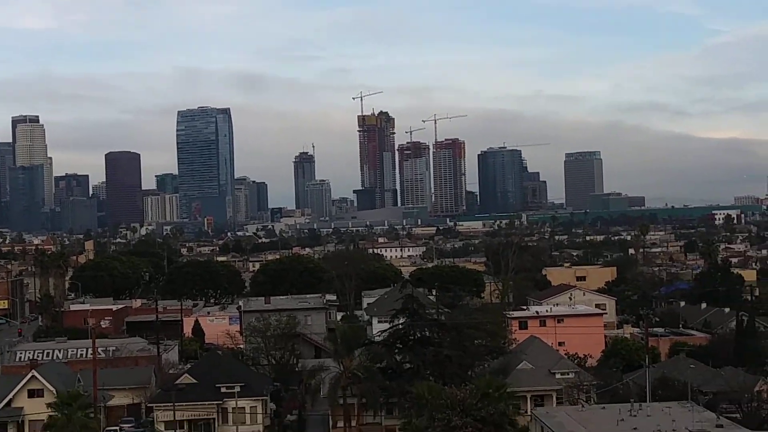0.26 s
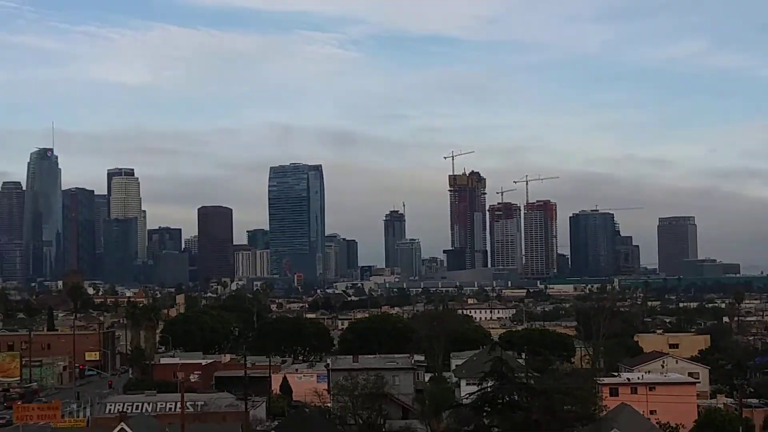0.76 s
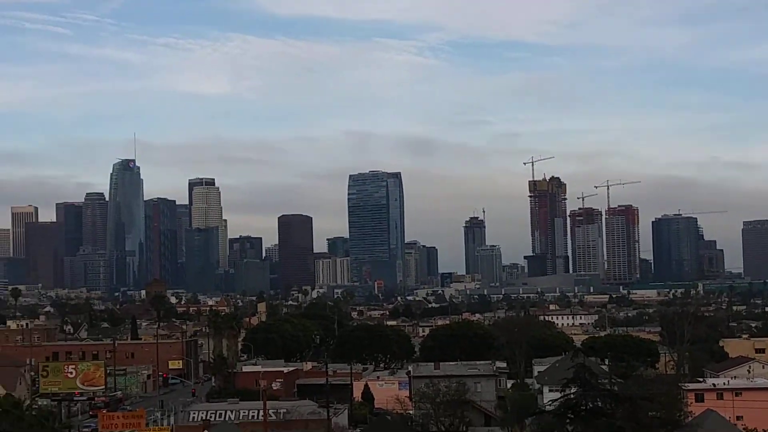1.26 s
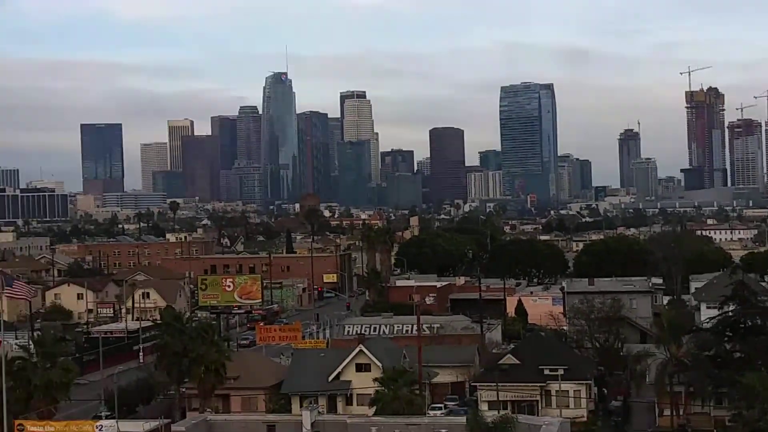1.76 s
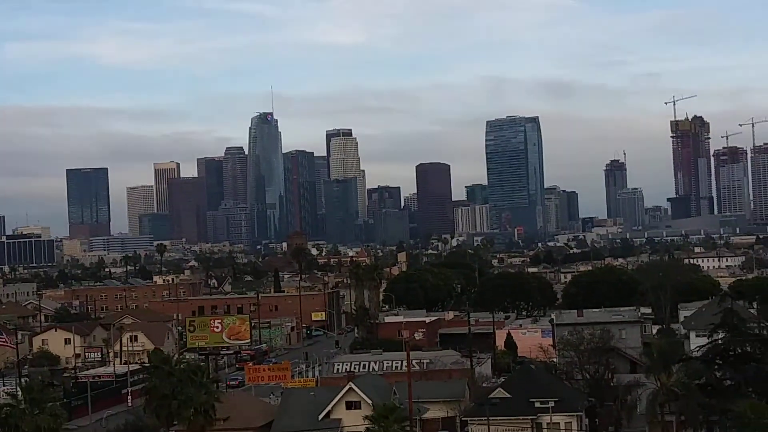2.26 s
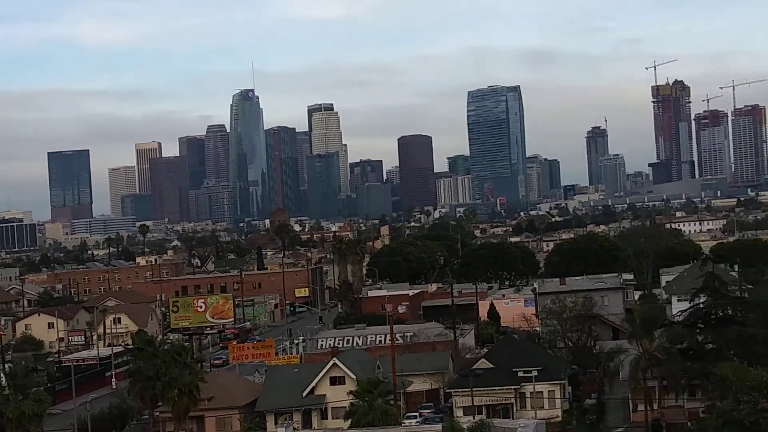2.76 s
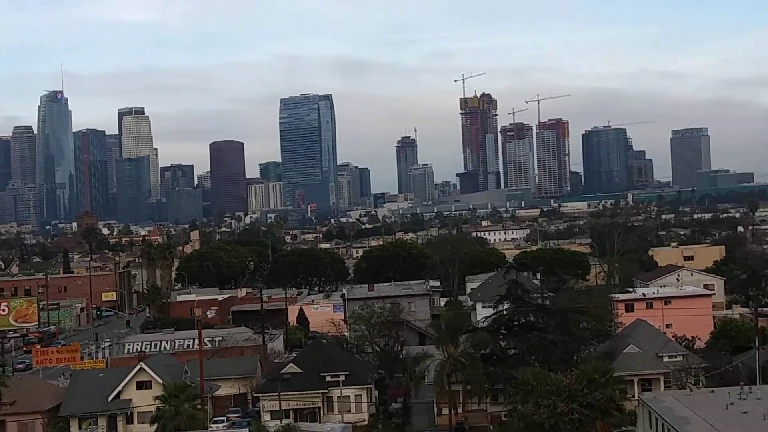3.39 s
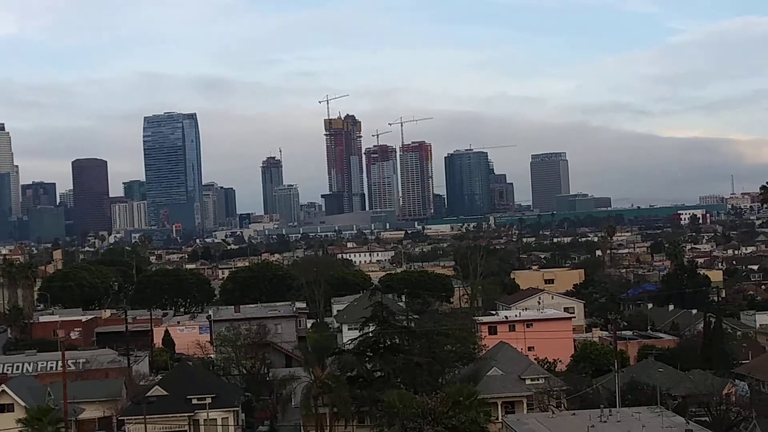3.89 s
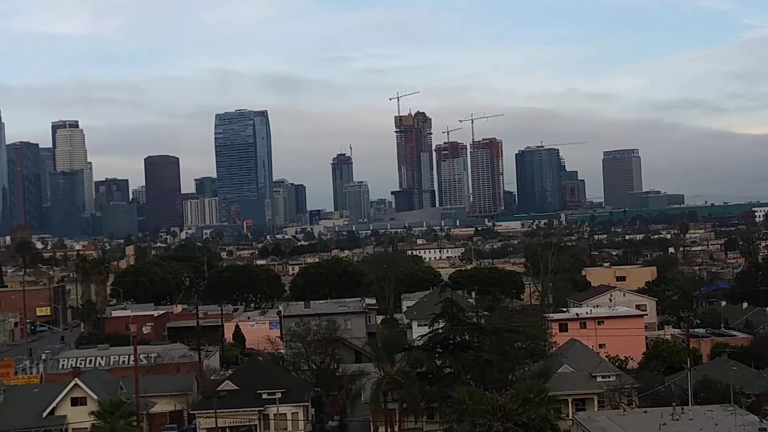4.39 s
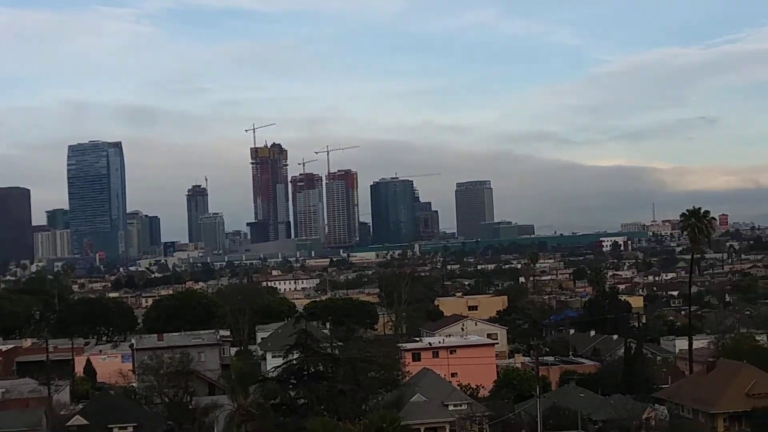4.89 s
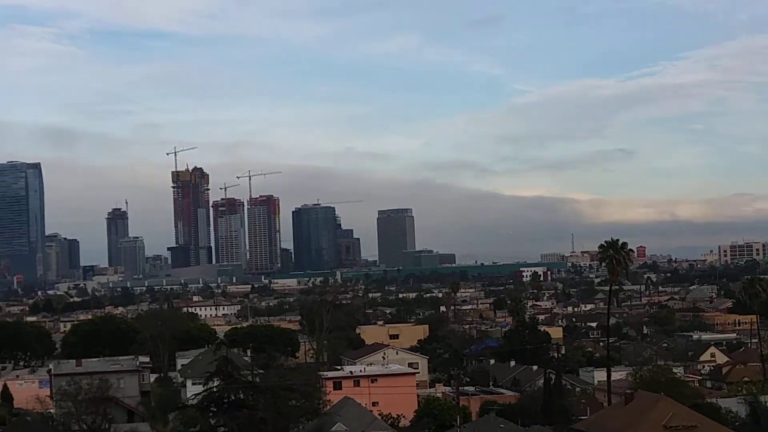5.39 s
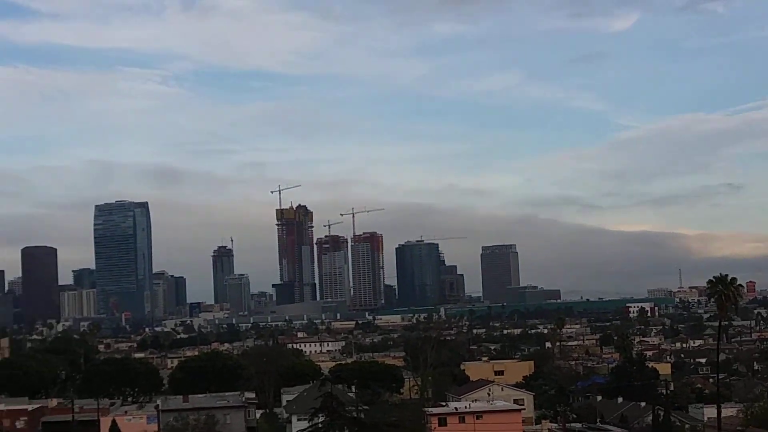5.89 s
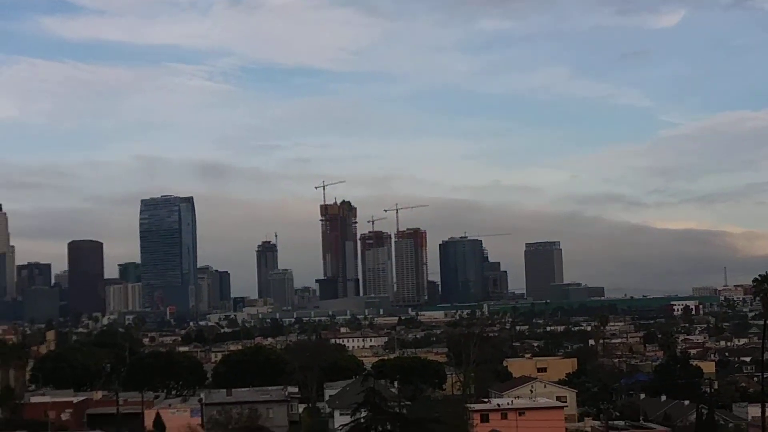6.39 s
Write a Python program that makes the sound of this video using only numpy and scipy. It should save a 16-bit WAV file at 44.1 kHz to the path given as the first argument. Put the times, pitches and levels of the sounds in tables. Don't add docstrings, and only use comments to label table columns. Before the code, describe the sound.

Close to a phone microphone at a high spot above a city, a dull latch thud is followed by a bright burst of bouncing metal. Small ticks and snaps follow while a low engine hum rises and becomes steady over muffled traffic and a thin whine. Wind thumps the microphone near four seconds; the hum sinks away, then returns weaker at the end.

```python
import sys
import numpy as np
from scipy import signal
from scipy.fft import rfft, irfft
from scipy.io import wavfile
from scipy.ndimage import uniform_filter1d

SR = 44100
rng = np.random.default_rng(int(sys.argv[2]) if len(sys.argv) > 2 else 0)


def volts_from_db(level):
    exponent = np.asarray(level, float) / 20
    return 10 ** exponent


def digitize_waveform(pressure):
    field = np.atleast_2d(pressure).T
    bounded = np.clip(field, -1, 1)
    quanta = np.round(bounded * 32767).astype(np.int16)
    wavfile.write(sys.argv[1], SR, quanta)


N = 293264
TIME = np.arange(N) / SR
HZ = np.maximum(np.fft.rfftfreq(N, 1 / SR), 1)


def rms_one(x):
    return x / np.sqrt(np.mean(x ** 2) + 1e-20)


def in_time(rows):
    s, *columns = np.transpose(rows)
    return [np.interp(TIME, s, column) for column in columns]


def shape(points, hz=HZ):
    f, level_db = np.transpose(points)
    return volts_from_db(np.interp(np.log(hz), np.log(f), level_db, left=-120, right=-120))


def noise(gain):
    return rms_one(irfft(rfft(rng.standard_normal(N)) * gain, N))


def drift(rate_hz):
    return noise(1 / (1 + (HZ / rate_hz) ** 2))


def dying(clicks, t60):
    return signal.lfilter([1], [1, -volts_from_db(-60 / (t60 * SR))], clicks + 1e-18)


def streaky(x, depth_db, hold_s, width_hz, above=np.full(N, -9.)):
    f, t, cells = signal.stft(x, SR, nperseg=1024)
    chance = rng.standard_normal(cells.shape)
    for _ in range(2):
        chance = uniform_filter1d(chance, max(1, round(hold_s / t[1])), axis=1)
        chance = uniform_filter1d(chance, max(1, round(width_hz / f[1])), axis=0)
    chance = rms_one(chance)
    is_open = np.clip(chance - np.interp(t, TIME, above), 0, 1)
    return signal.istft(cells * volts_from_db(depth_db * chance) * is_open, SR, nperseg=1024)[1][:N]


# (frequency [Hz], density [dB per Hz])
RUMBLE_SPECTRUM = [(20, -29.5), (40, -14), (60, -7), (80, 1.5), (125, -2.5), (200, -5.5), (300, -10),
                   (420, -30.5)]
TRAFFIC_SPECTRUM = [(200, -13.5), (330, 2), (415, -2), (450, 0.5), (520, -5.5), (1040, -4.5), (1500, -9),
                    (2100, -12), (2350, -20), (2600, -66)]
TREBLE_SPECTRUM = [(2100, -30.5), (2300, -1), (3120, -4), (3400, -18), (3700, -7), (4050, -9),
                   (4250, -34.5), (4700, -35), (5500, -43.5)]
LEAK_SPECTRUM = [(2500, -3), (4000, -5.5), (5200, -3), (5800, -18), (7300, -20), (8100, -1), (9000, -13.5),
                 (10000, -31.5), (13000, -15), (13500, -41)]
HISS_SPECTRUM = [(2300, -18), (2600, -9.5), (4500, -1.5), (7000, -11.5), (13000, -18), (16000, -21.5)]
# (time [s], level [dB])
OPENING = [(0, -87), (.2, -85), (1.1, -72), (1.5, -66), (1.9, -58.5), (2.57, -60.5), (3.15, -62),
           (3.5, -58.5), (4.5, -55.5), (5.0, -56.5), (5.75, -50.5), (6.2, -55), (6.65, -55.5)]
# (time [s], half length [s], level [dB])
GUSTS = [
    (2.1, .4, 2.5),
    (2.72, 0.2, 5.5),
    (3.15, 0.16, 3),
    (3.96, 0.38, 8),
]


def city():
    treble_db, = in_time(OPENING)
    shutting_db = np.minimum(treble_db + 62, 0)
    gusts_db = sum(db * np.exp(-((TIME - s) / half) ** 2) for s, half, db in GUSTS)

    rumble_db = -31 + 0.076 * shutting_db + gusts_db + 0.58 * drift(1.8)
    traffic_db = -34 + 0.13 * shutting_db + 0.47 * drift(3.9)
    rumble = volts_from_db(rumble_db) * noise(shape(RUMBLE_SPECTRUM))
    traffic = volts_from_db(traffic_db) * noise(shape(TRAFFIC_SPECTRUM))

    shut = (-61 - treble_db) / 5
    treble = streaky(noise(shape(TREBLE_SPECTRUM)), depth_db=3.5, hold_s=.06, width_hz=90, above=shut)
    treble *= volts_from_db(treble_db + 3.0)
    leaks = streaky(noise(shape(LEAK_SPECTRUM)), depth_db=1.5, hold_s=.045, width_hz=80,
                    above=np.full(N, 1.3))
    leaks *= volts_from_db(-61 + .5 * (treble_db + 58))
    hiss = volts_from_db(-73) * noise(shape(HISS_SPECTRUM))
    return rumble + traffic + treble + leaks + hiss


# (time [s], length [s], frequency [Hz], level [dB])
STREAKS = [(.13, .1, 3000, -62), (.47, .14, 3950, -64), (1.06, .15, 4000, -61), (1.22, .05, 2950, -59),
           (2.52, .1, 8080, -71), (2.55, .1, 4180, -62), (2.52, .08, 5400, -69), (2.74, .1, 5000, -68),
           (2.87, .4, 3850, -62), (3.4, .2, 4000, -62), (3.5, .12, 6000, -71), (3.68, .7, 4000, -62),
           (3.7, .2, 13000, -76), (4.38, .15, 12400, -77), (4.97, .5, 7830, -74), (5.25, .33, 6410, -63),
           (5.25, .2, 5150, -68), (5.75, .15, 5150, -68), (6.0, .12, 13100, -76)]


def streaks():
    out = np.zeros(N)
    far_motor = (3.35, .48, 820, -40.5, 120)
    for s, length, hz, level_db, climb in [(*row, 0) for row in STREAKS] + [far_motor]:
        age = np.arange(round(length * SR)) / SR
        at = round(s * SR)
        swell = np.sin(np.pi * age / length) ** 0.3
        tone = np.sin(2 * np.pi * (hz + climb * age / 2) * age)
        out[at:at + len(age)] += volts_from_db(level_db) * swell * tone
    return out * volts_from_db(5.0 * drift(45))


# (time [s], level [dB])
WHINE = [(0, -45.5), (.5, -49), (1.0, -48.5), (1.43, -41), (1.68, -53.5), (1.93, -41.5), (2.67, -39),
         (4.08, -44.5), (5.0, -48), (6.65, -49)]


def whine():
    level_db, = in_time(WHINE)
    return np.sqrt(2) * volts_from_db(level_db + 1.2 * drift(1.4)) * np.sin(2 * np.pi * 2000 * TIME)


# (time [s], pitch [Hz], level [dB])
HUM = [(0, 65.2, -39.5), (0.5, 76.45, -37), (0.62, 78.65, -29.5), (0.87, 83.85, -35), (1.02, 92, -25),
       (1.37, 97.5, -17.5), (2.0, 100.7, -18.5), (2.3, 102.2, -16), (2.45, 100.8, -17.5), (2.8, 92.45, -17),
       (3.5, 93.65, -17.5), (3.65, 95.9, -16), (4.85, 96.56, -20.5), (5.06, 97.44, -30.5),
       (5.6, 99.33, -34), (6.02, 90.46, -21.5), (6.46, 91.2, -21), (6.65, 87.2, -24.5)]
# (multiple of the hum [ratio], level [dB])
ORDERS = [(2 / 3, -41), (4 / 3, -39), (3 / 2, -39), (2, -47)]


def hum():
    splice_s, skipped_s = 3.6451, .0023
    hz, level_db = in_time(HUM)
    phase = 2 * np.pi * np.cumsum(hz + .8 * drift(4.5)) / SR
    phase -= phase[round(splice_s * SR)] - 0.05
    phase += 2 * np.pi * hz * skipped_s * (TIME >= splice_s)

    orders = sum(volts_from_db(db + 3.0 * drift(1.0)) * np.cos(k * phase) for k, db in ORDERS)
    orders *= volts_from_db(.4 * np.minimum(level_db + 16, 0))
    flutter_db = .9 + .5 * np.clip(-27 - level_db, 0, 6)
    return np.sqrt(2) * (volts_from_db(level_db + flutter_db * drift(25)) * np.cos(phase) + orders)


# (time [s], peak
# level [dB], frequency [Hz])
THUMPS = [(0.658, -18, 268.5), (0.654, -18.5, 850), (0.672, -20, 803), (3.662, -19, 145.2),
          (3.869, -24, 129.7), (3.923, -10.5, 130), (3.932, -11.5, 210), (4.04, -20.5, 157),
          (4.11, -16, 194), (5.54, -19, 98.2), (5.618, -18.5, 97.5)]


def thumps():
    out = np.zeros(N)
    for s, peak_db, hz in THUMPS:
        bump = np.exp(-((TIME - s) * hz / 1.7) ** 2)
        out += volts_from_db(peak_db) * bump * np.cos(2 * np.pi * hz * (TIME - s))
    return out


# (time [s], attack [s], hold [s], peak level [dB])
RUBS = [
    (1.552, .04, 0.57, -59),
    (3.171, 0.077, .1, -48.5),
    (5.205, 0.061, .15, -58),
    (5.846, .008, .003, -62.5),
]
# (frequency [Hz], density [dB per Hz])
RUB_SPECTRA = [
    [(1940, -47), (3300, -26), (3450, -15), (3950, 5), (5320, -5), (5510, -15), (7000, -30.5), (9100, -58),
     (15400, -120)],
    [(1410, -30), (2400, -4), (3050, -16.5), (3890, 2.5), (4390, -19.5), (6950, -10), (16000, -31)],
    [(4200, -27), (5000, 1), (5600, -1), (7000, -9.5), (8500, -11), (9500, -15.5)],
    [(7400, -16.5), (8000, -5), (9000, -1), (10000, -14)],
]


def rub():
    out = np.zeros(N)
    for (s, attack, hold, peak_db), spectrum in zip(RUBS, RUB_SPECTRA):
        swell_db = 21 * np.clip(1 - (TIME - s) / attack, 0, None) ** 2
        release_db = 276.5 * np.clip(TIME - s - attack - hold, 0, None)
        level_db = peak_db - swell_db - release_db
        friction = streaky(noise(shape(spectrum)), depth_db=5.0, hold_s=.06, width_hz=110,
                           above=(-57 - level_db) / 7)
        out += volts_from_db(level_db) * friction
    return out


def blow_energy(age, octave, rise, contact_t60):
    t60 = max(contact_t60 + 4.4 * rise, .01) * 2 ** (-.3 * octave)
    attack = (1 - np.exp(-age / max(rise, 1e-4))) ** 2
    crack = volts_from_db(0.5 + 5.4 * octave - 120 * age / 0.077) * (rise < .0015)
    return attack * (volts_from_db(-120 * age / t60) + crack)


def blows(events, colour, contact_t60, ring_db, level_db, streak_db):
    room_db, room_t60 = -17, 0.36
    spectrum, resonances = colour
    rings = np.zeros(len(HZ))
    for hz, width, db in resonances:
        rings += volts_from_db(db) / (1 + ((HZ - hz) / (width / 2)) ** 2) / shape(spectrum, hz).clip(1e-4)
    body = noise(shape(spectrum) * (1 + volts_from_db(ring_db) * rings))
    body = rfft(streaky(body, streak_db, hold_s=.03, width_hz=200))

    out, chatter = np.zeros(N), volts_from_db(2.3 * drift(202.5))
    for octave in np.arange(-3.5, 3):
        centre_hz = 3000 * 2 ** octave
        band = irfft(body * np.clip(1 - np.abs(np.log2(HZ / centre_hz)), 0, 1), N)
        contact, tail = np.zeros(N), np.zeros(N)
        for s, peak_db, tilt_db, rise in events:
            at = round(s * SR)
            age = TIME[:min(N - at, SR // 2)]
            lowest = -1 if tilt_db < 0 else -4
            energy = volts_from_db(peak_db + tilt_db * max(octave, lowest)) ** 2
            contact[at:at + len(age)] += energy * blow_energy(age, octave, rise, contact_t60)
            tail[at] += energy
        tail = dying(tail, room_t60 / 2 * 2 ** (-.35 * octave))
        tail = dying(tail, 0.045) / (0.014 * SR / np.log(1000))
        out += band * np.sqrt(contact * chatter + volts_from_db(2 * room_db) * tail)
    return volts_from_db(level_db) * out


# (time [s], peak level [dB], brightness [dB per octave], rise [s])
SNAPS = [(1.872, -49, -9.5, 0.0056), (1.897, -34, -9.5, 0.0034), (1.929, -30.5, -8, 0.0032),
         (1.997, -20, -0.5, 0.0017), (2.008, -24.5, 4.5, 0.0025), (2.019, -16, -6.5, 0.0028),
         (2.089, -26, -10, 0.0044), (2.15, -31, -3.5, 0.045), (2.203, -38.5, 5, 0.0035),
         (3.263, -38, 2, .008), (3.321, -33, -1, 0.0028)]
# (frequency [Hz], width [Hz], level [dB])
SNAP_COLOUR = [(650, -33.5), (1100, -9.5), (1950, -8.5), (2410, -11), (2920, -2.5), (3490, -10.5),
               (5710, -7), (16000, -41.5)], [(1375, 150, -2.5), (1880, 50, -4.5), (2820, 55, -0.5),
               (3620, 100, -16), (4660, 59, 6), (5730, 190, -7.5), (6300, 83, -19), (6980, 35, -23.5),
               (7450, 56, -25), (8300, 120, -26.5)]


def snaps():
    return blows(SNAPS, SNAP_COLOUR, contact_t60=0.1, ring_db=-7.5, level_db=-5, streak_db=0.8)


# (time [s], peak level [dB], brightness [dB per octave], rise [s])
TICKS = [
    (1.2845, -22.5, 3.5, .0005),
    (1.344, -24, -9.5, 0.0022),
    (1.396, -26, -12.5, 0.0047),
    (1.420, -25, -3.5, .001),
]
# (frequency [Hz], width [Hz], level [dB])
TICK_COLOUR = [(1350, -45.5), (2300, -5), (3030, -5), (3540, -7.5), (6090, 4.5), (9600, -16),
               (13700, -19.5), (16000, -30)], [(3660, 51, 5.5), (4940, 31, -3), (5500, 26, -8),
               (5730, 92, -14), (6400, 88, 0), (6640, 22, -7), (7480, 29, -12), (10600, 41, -19),
               (13200, 51, -20.5)]


def ticks():
    return blows(TICKS, TICK_COLOUR, contact_t60=0.21, ring_db=-2.0, level_db=-10.5, streak_db=-2.0)


# (frequency [Hz], level [dB], t60 [s])
PANEL_MODES = [(293, -6, .3), (345, -1, .54), (371, -6, .3), (416, -7, .7), (470, -7, .8), (652, -3, .7),
               (826, -4, .35), (874, 8.5, .11), (931, -5, .15), (1012, -6, .3)]
# (time [s], peak level [dB])
PANEL_BLOWS = [
    (.307, -30),
    (.328, -15.5),
    (.349, -30),
]


def panel():
    out, clicks = np.zeros(N), np.full(N, 1e-18)
    for s, peak_db in PANEL_BLOWS:
        clicks[round(s * SR)] = volts_from_db(peak_db)
    for hz, level_db, t60 in PANEL_MODES:
        r, w = volts_from_db(-60 / (t60 * SR)), 2 * np.pi * hz / SR
        late_clicks = np.roll(clicks, round(3.0 * SR / hz))
        out += volts_from_db(level_db) * signal.lfilter([0, np.sin(w)], [1, -2 * r * np.cos(w), r * r], late_clicks)
    return out


# (time [s], peak level [dB], brightness [dB per octave], rise [s])
CLATTER = [(.644, -14.5, -14.5, 0.013), (.6535, -13, 1, 0.00042), (.666, -0.5, -2, 0.00029),
           (.696, -2, 1.5, 0.00034), (.704, 0.5, -7.5, 0.0016), (.724, -1.5, -5, 0.0034),
           (.759, -4.5, -3.5, 0.00063), (.775, -6.5, -8.5, 0.0035), (.794, -7.5, -4.5, 0.00041),
           (.811, -15.5, -10, 0.0043), (.8325, -13.5, -7, 0.00057), (.90, -10.5, -5, 0.00061),
           (.933, -10, -3.5, 0.001), (.974, -32.5, -19.5, 0.0037)]
# (frequency [Hz], width [Hz], level [dB])
CLATTER_COLOUR = ([(200, -32.5), (450, -18.5), (750, -11.5), (1000, -15), (2400, -8), (4200, -6.5),
                  (6400, -8), (9000, -15.5), (16000, -39)], [(1023, 41, -4), (1390, 63, -4), (1863, 48, 0),
                  (2150, 150, -2), (2960, 54, 2), (3800, 51, 2), (4380, 57.6, -14), (5000, 41, -8.5),
                  (5530, 53, -5.5), (5700, 74, -7), (6520, 340, -3.5), (7420, 40, -9), (9500, 66, -18),
                  (11220, 57, -20)])


def clatter():
    return blows(CLATTER, CLATTER_COLOUR, contact_t60=.11, ring_db=-4.0, level_db=-10.5, streak_db=2.85)


# (time [s], peak level [dB], brightness [dB per octave], rise [s])
LATCH = [
    (.048, -29, 5, 0.0053),
    (.309, -13.5, -5.5, 0.011),
    (.328, 0.5, 0.5, 0.0085),
    (.349, -12.5, -3.5, 0.002),
    (.380, -10.5, 0, 0.0064),
]
# (frequency [Hz], width [Hz], level [dB])
LATCH_COLOUR = [(150, -31.5), (220, -5), (530, -14.5), (850, 3.5), (1100, -9), (5900, -18), (12000, -33),
                (16000, -49.5)], [(1640, 67, -2.5), (2200, 200, -5.5), (2974, 29.4, -12), (4020, 34, 0.5),
                (4930, 170, -23), (5860, 70, -3), (9050, 75, -7)]


def latch():
    return blows(LATCH, LATCH_COLOUR, contact_t60=0.11, ring_db=-7.5, level_db=-7, streak_db=-1.5)


def scene():
    outside = city() + streaks() + whine() + hum() + thumps()
    inside = rub() + snaps() + ticks() + panel() + clatter() + latch()
    return (outside + inside)[None]


def band_limit(x):
    return signal.sosfilt(signal.butter(12, 16460, fs=SR, output="sos"), x)


def record(dry):
    limited = 0.73 * np.tanh(dry / 0.79) - .0012
    top_cut = signal.cheby2(10, 60, 17200, fs=SR, output="sos")
    return band_limit(signal.sosfilt(top_cut, limited))


dry = scene()
out = record(dry)
digitize_waveform(out)
```